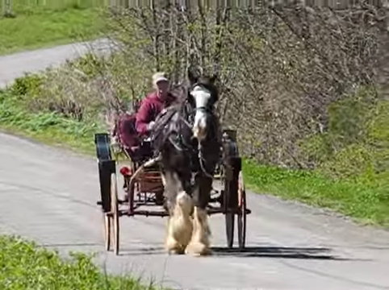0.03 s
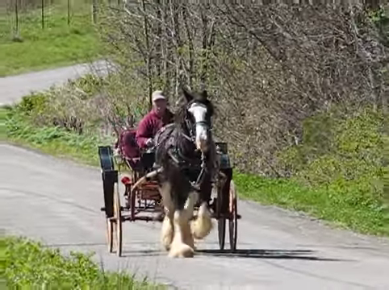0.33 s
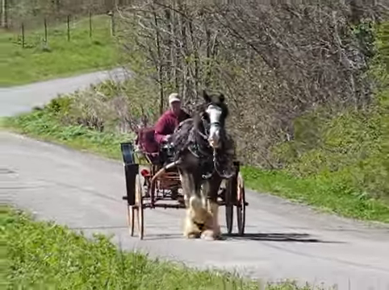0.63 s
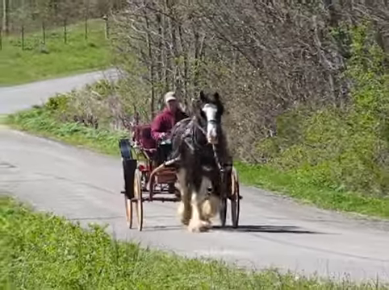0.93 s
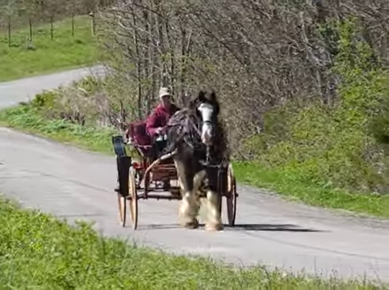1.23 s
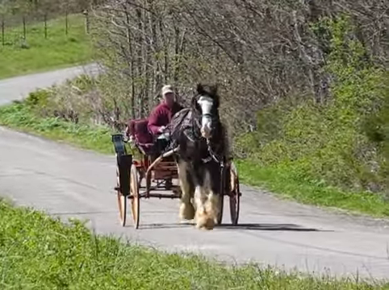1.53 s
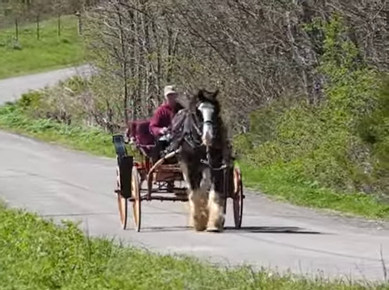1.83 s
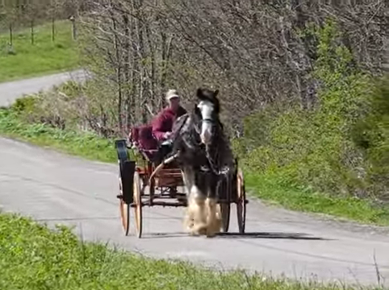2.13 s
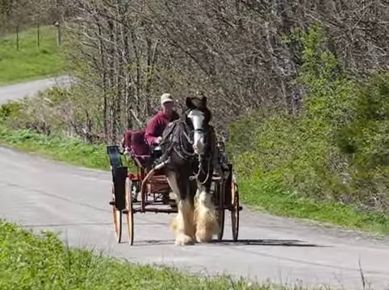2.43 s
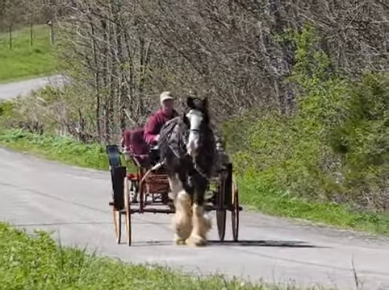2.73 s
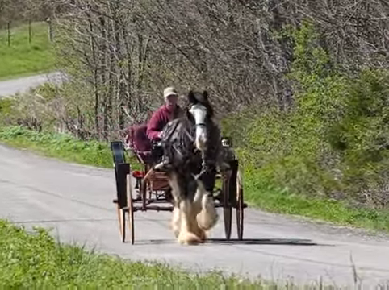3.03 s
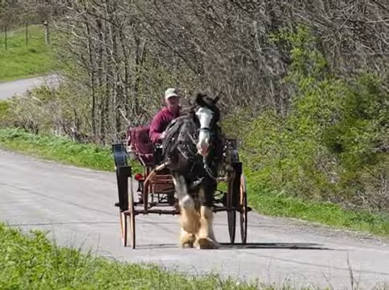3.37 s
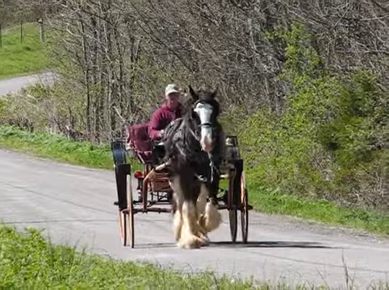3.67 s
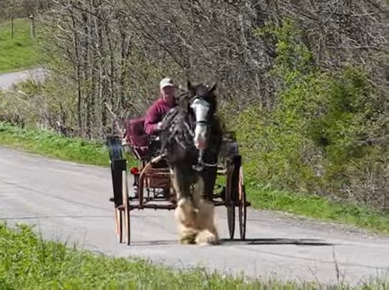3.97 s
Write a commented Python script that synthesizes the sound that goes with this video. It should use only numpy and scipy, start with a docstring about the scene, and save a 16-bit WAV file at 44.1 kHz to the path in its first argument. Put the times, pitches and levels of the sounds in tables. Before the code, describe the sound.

Harness metal jingles as a horse-drawn buggy rolls along a road, with wind on the microphone.

```python
"""A heavy horse draws a buggy along a paved country road, some way off from the microphone.
Its harness metal jingles in time with its gait, as showers of small contacts set it ringing.
The wheels crunch over grit and crack single stones, and the hooves knock faintly on the asphalt.
Close up, gusts buffet the two microphone ports and die down.
A thin, steady electronic whine from the camera sounds over a quiet outdoor hush."""
import sys
import numpy as np
from scipy import signal
from scipy.fft import rfft, irfft
from scipy.io import wavfile

SR = 44100
rng = np.random.default_rng(int(sys.argv[2]) if len(sys.argv) > 2 else 0)


def materialize(psi):
    """Save the field psi as 16-bit PCM at rate SR to the path in sys.argv[1].

    A 1-D psi becomes a single channel; in a 2-D psi each row is a channel.
    """
    bounded = np.clip(np.atleast_2d(psi).T, -1, 1)
    quanta = np.round(bounded * 32767).astype(np.int16)
    wavfile.write(sys.argv[1], SR, quanta)


N = 176400
T = np.arange(N) / SR


def from_db(db):
    """Decibels to gain."""
    return 10 ** (np.asarray(db) / 20)


def rms_one(x):
    """Scale to rms 1."""
    return x / np.sqrt(np.mean(x ** 2) + 1e-20)


def in_time(rows):
    """Join (seconds, value) rows into a curve at every sample."""
    return np.interp(T, *np.transpose(rows))


def per_bin(points):
    """Join (Hz, value) rows over log frequency, at every FFT bin."""
    hz, value = np.transpose(points)
    return np.interp(np.log(np.arange(N // 2 + 1) * SR / N + 1), np.log(hz), value)


def coloured(x, colour):
    """Filter by a spectrum, keeping the power of white input."""
    return irfft(rfft(x) * rms_one(from_db(per_bin(colour))), N)


def pan(db):
    """Left and right gains of mean power 1, from left minus right in dB."""
    gains = from_db(np.array([[.5], [-.5]]) * db)
    return gains / np.sqrt(np.mean(gains ** 2, axis=0))


def drift(per_s):
    """A random wander of rms 1, with per_s new values a second."""
    knots = rng.standard_normal(4000)
    return rms_one(np.interp(T * per_s, np.arange(len(knots)), knots))


def spread(x, diffuse):
    """Mix in a share of scattered sound, different at each port."""
    return np.sqrt(1 - diffuse ** 2) * x + diffuse * rng.standard_normal((2, N))


def grains(per_s, spread_db):
    """Random clicks of uneven size, rms 1."""
    sizes = from_db(spread_db * np.minimum(rng.exponential(1, N), 4))
    return rms_one(sizes * rng.choice([-1, 1], N) * (rng.random(N) < per_s / SR))


def ring(x, hz, width_hz):
    """A resonator: a unit click sets a sine of height 1 ringing."""
    r, w = np.exp(-np.pi * width_hz / SR), 2 * np.pi * hz / SR
    return signal.lfilter([.5, 0, -.5], [1, -2 * r * np.cos(w), r * r], x + 1e-18)


def dying(s, decay_s):
    """Sudden start at s seconds, exponential decay."""
    return (T >= s) * np.exp(-abs(T - s) / decay_s)


# The open air around the road. Each row: frequency in Hz, relative level in dB.
AIR_SPECTRUM = [(40, -3.5), (85, 4.5), (230, -0.5), (420, -9), (650, -15.5), (2300, -21.5), (8000, -29.5),
                (15000, -43)]

def air():
    """An even outdoor hush, partly different at each port."""
    return from_db(-35) * coloured(spread(rng.standard_normal(N), diffuse=0.46), AIR_SPECTRUM)


# Tones from inside the camera. Each row: pitch in Hz, base level in dB, left minus right in dB.
WHINE_TONES = [(7852, -60, -2), (8280, -58, -25)]

def camera_whine(frame_hz=30, waver_db=1):
    """Electronic interference: two thin tones flutter at the frame rate and waver in level."""
    flutter = 1 + np.cos(2 * np.pi * frame_hz * T)
    out = 0
    for hz, db, pan_db in WHINE_TONES:
        level = from_db(db + waver_db * drift(per_s=22))
        out += pan(pan_db) * level * flutter * np.sin(2 * np.pi * hz * T)
    return out


# Gusts at the left and right microphone ports. Each row: time in seconds, strength in dB.
LEFT_GUSTS = [(0, -20.5), (.25, -17.5), (.68, -25.5), (.85, -19.5), (1.35, -29), (2.45, -34.5), (4, -50.5)]
RIGHT_GUSTS = [(0, -26), (.32, -21.5), (.6, -32.5), (1.3, -25), (2.2, -29.5), (2.44, -22.5), (2.62, -34),
               (4, -50)]
# The wind's rumble and flutter. Each row: frequency in Hz, relative level in dB.
RUMBLE_SPECTRUM = [(12, -7), (45, 2), (105, 0), (200, -10.5), (900, -66)]
FLUTTER_SPECTRUM = [(90, -8.5), (190, -5.5), (400, -13.5), (1500, -55)]

def wind(gusts, reference_db=-24, flutter_growth=1.97, lumpy_db=3.5):
    """Wind rumbles on one port; the higher, lumpy flutter grows faster than the gust."""
    gust_db = in_time(gusts)
    rumble = from_db(gust_db + 2) * coloured(rng.standard_normal(N), RUMBLE_SPECTRUM)
    lumps = from_db(lumpy_db * drift(per_s=70))
    eddies = rms_one(lumps * coloured(rng.standard_normal(N), FLUTTER_SPECTRUM))
    flutter_db = reference_db - 10.5 + flutter_growth * (gust_db - reference_db)
    return rumble + from_db(flutter_db) * eddies


# Buffets right on the microphone. Each row: peak time in seconds, level in dB, left minus right in dB.
BUFFET_PEAKS = [(0.234, -13.5, 12), (0.769, -12, -25), (0.864, -12, -1), (1.148, -14, -13),
                (1.524, -13, -16), (1.81, -19.5, -14), (2.722, -21, 3.5), (3.73, -31.5, 12)]
# Their low roar. Each row: frequency in Hz, relative level in dB.
BUFFET_SPECTRUM = [(25, 1.5), (90, 1.5), (200, 0), (400, -14.5), (1300, -58.5)]

def buffets(rise_s=0.028, fall_s=0.012):
    """Eddies build up against a port and break off."""
    swell = 0
    for s, db, pan_db in BUFFET_PEAKS:
        envelope = np.exp(-np.maximum((s - T) / rise_s, (T - s) / fall_s))
        swell += pan(pan_db) * from_db(db) * envelope
    return swell * coloured(rng.standard_normal((2, N)), BUFFET_SPECTRUM)


# Thumps on the right port. Each row: centre in seconds, peak in dB, width in seconds.
PORT_THUMPS = [(0.873, -6, 0.00077), (1.147, -5.5, 0.0011), (2.316, -11, 0.0023), (2.375, -13, 0.0023),
               (2.438, -6.5, .0035)]

def thumps():
    """Each eddy gives the right port one dull push and pull."""
    pressure = 0
    for s, db, width_s in PORT_THUMPS:
        lead = (s - T) / width_s
        pressure += from_db(db) * lead * np.exp(.5 * (1 - lead ** 2))
    return np.array([np.zeros(N), pressure])


# Scuffs out on the road, to the right. Each row: peak time in seconds, level in dB.
SCUFF_PEAKS = [(0.9, -32), (2.201, -38.5), (2.713, -35)]
# Their bright hiss. Each row: frequency in Hz, relative level in dB.
SCUFF_SPECTRUM = [(5000, -6.5), (7900, 3), (15000, -42)]

def scuffs(width_s=0.0083):
    """Short swells of bright scraping."""
    swell = sum(from_db(db) * np.exp(-.5 * ((T - s) / width_s) ** 2) for s, db in SCUFF_PEAKS)
    return pan(-16) * swell * coloured(rng.standard_normal(N), SCUFF_SPECTRUM)


def grit():
    """Grains click on the road, mixed with much scattered sound."""
    return spread(grains(per_s=700, spread_db=2.5), diffuse=0.65)


# Modes of a hoof on asphalt. Each row: pitch in Hz, width in Hz, gain in dB.
HOOF_RESONANCES = [(233, 70, -6), (648, 45, -5), (906, 160, 3), (1102, 53, -1), (1377, 118, -3.5),
                   (2220, 730, -4)]

def hoof_body(x):
    """The dull thud and ring of a hoof: its modes add with alternating signs."""
    return sum((-1) ** k * from_db(db) * ring(x, hz, width_hz)
               for k, (hz, width_hz, db) in enumerate(HOOF_RESONANCES))


# Hoof falls, some way off. Each row: start in seconds, strike strength in dB, scrape level in dB.
HOOF_FALLS = [(.906, -19.5, -40), (0.961, -32, -64), (1.863, -34.5, -44), (2.502, -42, -39.5),
              (3.197, -31.5, -39)]

def hooves(toe_lag_s=0.00511, toe_db=-4.5):
    """Heel then toe strike the road; the shoe then slides briefly over grit."""
    blows, slide = np.zeros(N), 0
    for s, db, scrape_db in HOOF_FALLS:
        blows[int(s * SR)] += from_db(db)
        blows[int((s + toe_lag_s) * SR)] += from_db(db + toe_db)
        slide += from_db(scrape_db) * dying(s, decay_s=0.063)
    return hoof_body(blows) + slide * rms_one(hoof_body(grit()))


# Single stones under a rim. Each row: start in seconds, strength in dB, pitch in Hz.
STONE_CRACKS = [(0.316, -26, 2200), (0.6577, -24, 2360), (.827, -23, 3200), (1.840, -24.5, 2980),
                (2.238, -31, 3670), (2.886, -24, 2330), (3.542, -26.5, 4200), (3.66, -26, 4060)]

def stones(width_hz=870):
    """Each larger stone bursts with a short crack at its own pitch."""
    out, noise = 0, rng.standard_normal(N)
    for s, db, hz in STONE_CRACKS:
        burst = noise * dying(s, decay_s=0.0016)
        # Steady noise through the same resonators sets the scale of the crack.
        crack, steady = ring(ring(np.array([burst, noise]), hz, width_hz), hz, 2 * width_hz)
        out += from_db(db) * crack / np.std(steady)
    return out


def patchy(x, flicker_db=3.5):
    """Each narrow band of the crunch flickers on its own."""
    spectrum, out = rfft(x), 0
    centres_hz = np.geomspace(1400, 9000, num=30)
    band_index = per_bin([(hz, k) for k, hz in enumerate(centres_hz)])
    for k in range(len(centres_hz)):
        band = irfft(spectrum * np.maximum(0, 1 - abs(band_index - k)), N)
        out += band * from_db(flicker_db * drift(per_s=45 * rng.uniform(.8, 1.2)))
    return rms_one(out)


# Grit under the wheels, some way off. Each row: time in seconds, relative level in dB.
CRUNCH_LEVEL = [(0, -39.5), (0.37, -38), (0.59, -42.5), (0.64, -38), (1.0, -36.5), (1.1, -42), (1.42, -40),
                (1.93, -43.5), (2.05, -38.5), (2.62, -43), (2.71, -37), (3.28, -46), (3.37, -41),
                (3.65, -37.5), (3.82, -47.5), (4, -40.5)]
# The colour of the crunch. Each row: frequency in Hz, relative level in dB.
CRUNCH_SPECTRUM = [(1400, -20), (2100, -1), (4300, -3.5), (6300, -7.5), (7700, -8.5), (9000, -19.5),
                   (15000, -32)]
# Its balance at the microphone. Each row: frequency in Hz, left minus right in dB.
CRUNCH_BALANCE = [(3600, -3), (4900, 5.5), (7200, -65)]
# Ringing parts of the buggy. Each row: pitch in Hz, width in Hz, level against the crunch in dB.
BUGGY_RESONANCES = [(1846, 90, -17), (2400, 260, -17.5), (3563, 56, -16)]

def wheels(trim_db=-1, uneven_db=2.5):
    """Dense grains crunch under the rims and ring the buggy."""
    force = patchy(grit()) * from_db(in_time(CRUNCH_LEVEL) + trim_db + uneven_db * drift(per_s=100))
    body = sum(from_db(db) * np.std(force) * rms_one(ring(force, hz, width_hz))
               for hz, width_hz, db in BUGGY_RESONANCES)
    crunch = coloured(force, CRUNCH_SPECTRUM)
    return irfft(rfft(crunch + body) * pan(per_bin(CRUNCH_BALANCE)), N)


# The harness metal's main modes. Each entry: pitch in Hz.
METAL_HZ = [4960, 5085, 5230, 5422, 5478]
# The same modes in order. Each row: resonator width in Hz, gain in dB, left minus right in dB.
METAL_MODES = [(95.5, -8.5, 2), (70, -2, 22.5), (304, -9, 38), (46, -20, 65), (70, -13.5, 64)]
# Hard knocks of metal on metal. Each row: start in seconds, strength in dB.
CLINK_HITS = [(.078, -17.5), (.888, -18), (1.128, -30), (1.399, -19), (2.317, -24)]

def clinks(band_hz=240):
    """One hard contact rings all the main harness modes at once."""
    blows, out = np.zeros(N), 0
    for s, db in CLINK_HITS:
        blows[int(s * SR)] = from_db(db)
    for hz, (width_hz, db, pan_db) in zip(METAL_HZ, METAL_MODES):
        ringing = ring(ring(blows, hz, width_hz), hz, band_hz)
        out += from_db(db) * pan(pan_db) * ringing * blows.max() / abs(ringing).max()
    return out


# The harness shaking with the gait, some way off. Each row: time in seconds, strength in dB.
HARNESS_SHAKE = [(0, -32), (0.12, -27.5), (0.17, -40), (0.39, -31.5), (0.58, -43.5), (0.71, -28.5),
                 (0.77, -32), (0.82, -21), (0.95, -35), (0.99, -26), (1.3, -39), (1.36, -34.5),
                 (1.53, -30.5), (1.58, -45), (1.74, -33), (1.95, -43), (2.09, -25.5), (2.2, -42.5),
                 (2.36, -46.5), (2.39, -30), (2.5, -42), (2.56, -30), (2.65, -42.5), (2.71, -26),
                 (2.98, -40.5), (3.09, -36), (3.28, -46), (3.43, -28.5), (3.57, -41.5), (3.71, -33),
                 (3.83, -43.5), (4, -38)]
# Its highest modes. Each row: pitch in Hz, resonator width in Hz, gain in dB, left minus right in dB.
HIGH_MODES = [(10000, 140, -7.5, -34), (10860, 130, -10, -24), (13210, 180, -18, -10)]
# The drive of those high modes. Each row: time in seconds, level against the shake in dB.
HIGH_DRIVE = [(0, -30), (2.6, -18.5), (3.3, -13)]

def harness(uneven_db=2):
    """A shower of small metal contacts rings the modes, swelling with each step."""
    shake_db = in_time(HARNESS_SHAKE) + uneven_db * drift(per_s=28)
    main_modes = [(hz, *row) for hz, row in zip(METAL_HZ, METAL_MODES)]
    out = 0
    for drive_db, modes in ((shake_db, main_modes), (shake_db + in_time(HIGH_DRIVE), HIGH_MODES)):
        for hz, width_hz, db, pan_db in modes:
            contacts = spread(grains(per_s=1300, spread_db=3.5), diffuse=0.18)
            ringing = ring(ring(contacts, hz, width_hz), hz, width_hz)
            out += from_db(drive_db + db) * pan(pan_db) * rms_one(ringing)
    return out


def scene():
    """Horse and buggy out on the road, open air behind, wind on the microphone, camera whine."""
    buggy = harness() + clinks() + wheels() + stones() + scuffs() + hooves()
    background = air() + camera_whine()
    on_ports = buffets() + thumps() + np.array([wind(LEFT_GUSTS), wind(RIGHT_GUSTS)])
    return buggy + background + on_ports


def record(dry):
    """The top is cut steeply above 15730 Hz."""
    return signal.sosfilt(signal.ellip(12, .1, 90, 15730, fs=SR, output="sos"), dry)


dry = scene()
out = record(dry)
materialize(out)
```